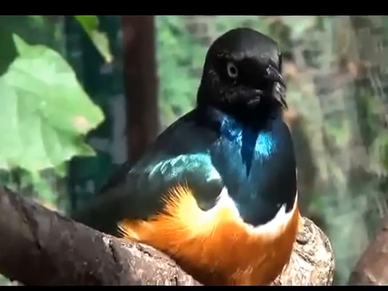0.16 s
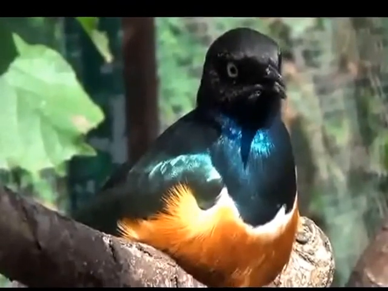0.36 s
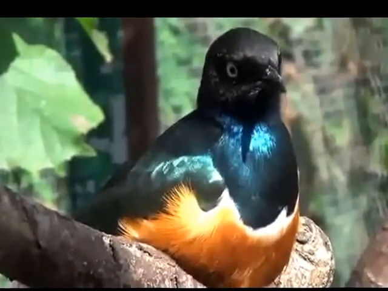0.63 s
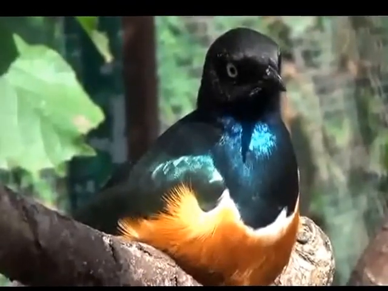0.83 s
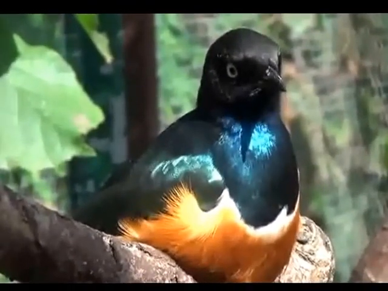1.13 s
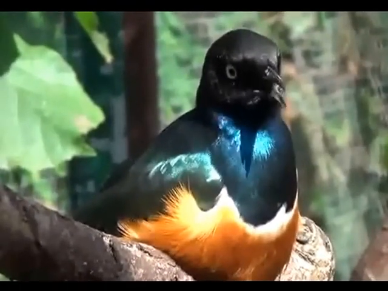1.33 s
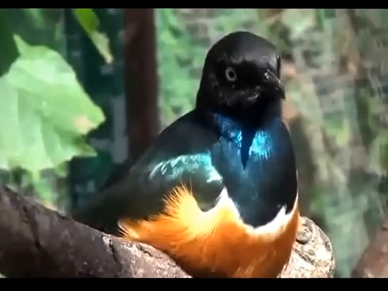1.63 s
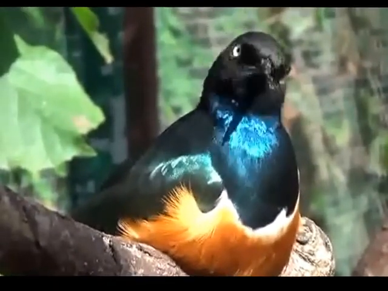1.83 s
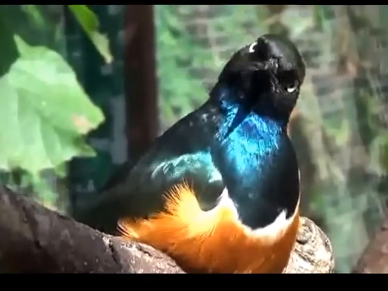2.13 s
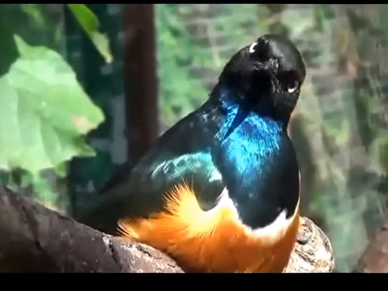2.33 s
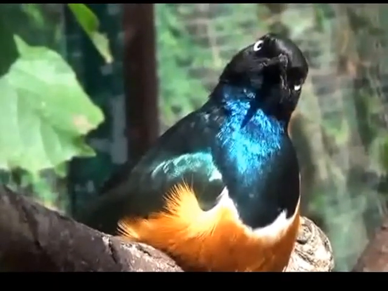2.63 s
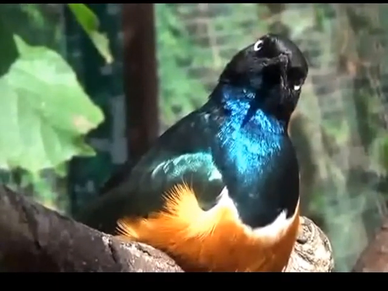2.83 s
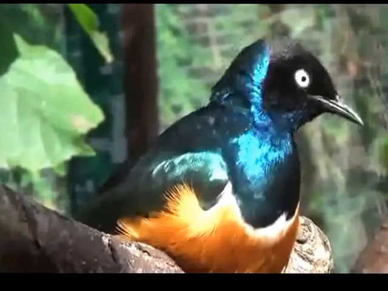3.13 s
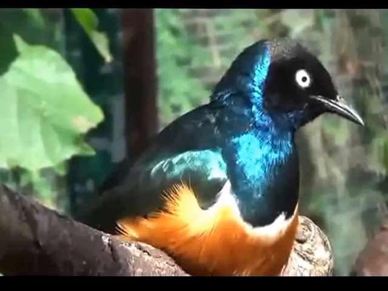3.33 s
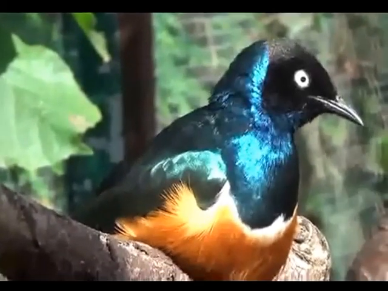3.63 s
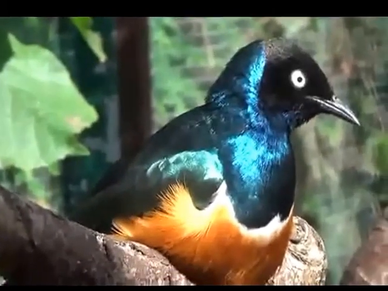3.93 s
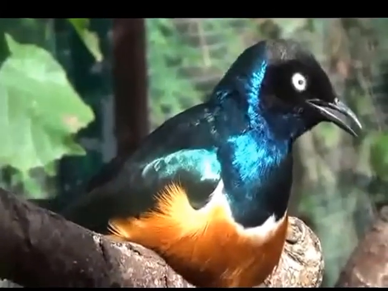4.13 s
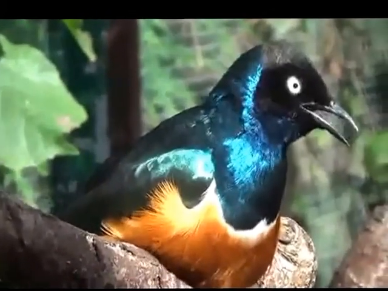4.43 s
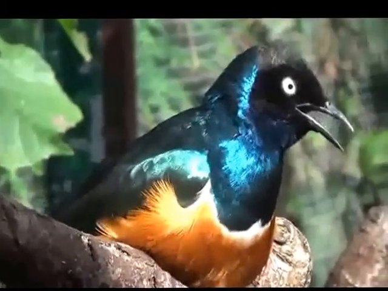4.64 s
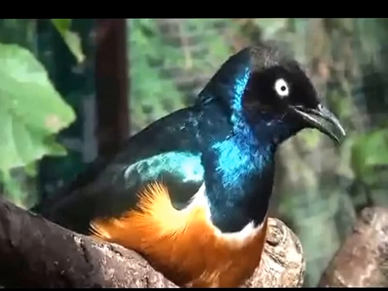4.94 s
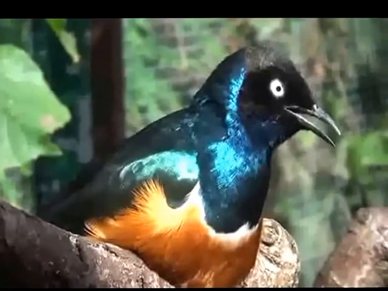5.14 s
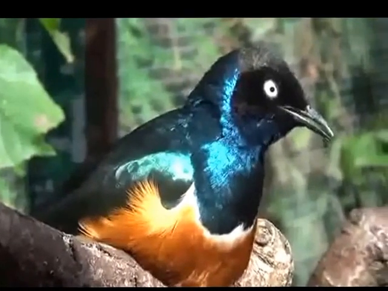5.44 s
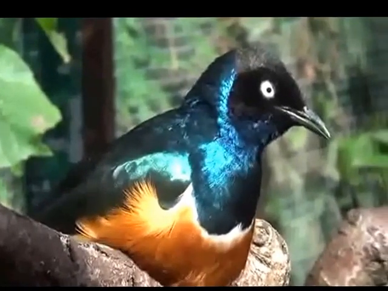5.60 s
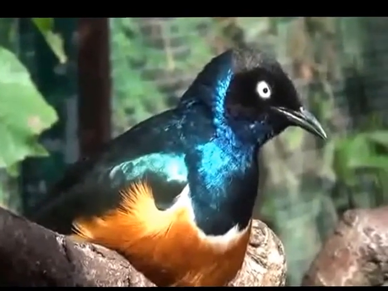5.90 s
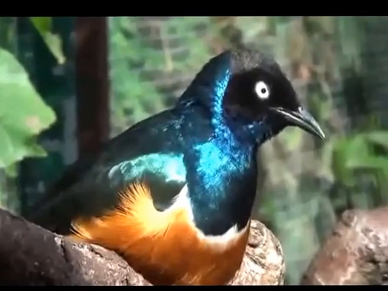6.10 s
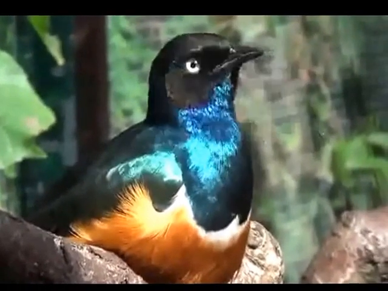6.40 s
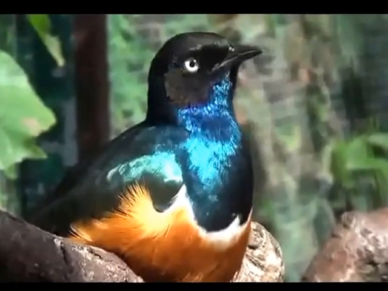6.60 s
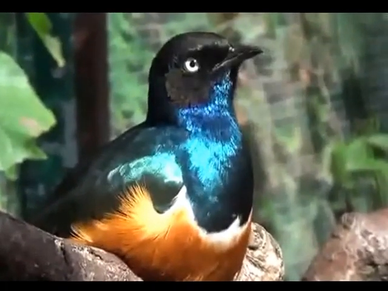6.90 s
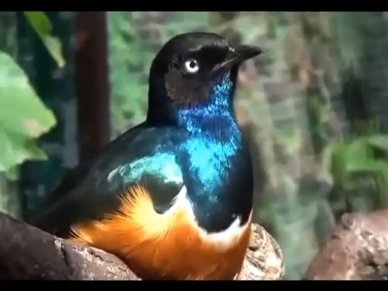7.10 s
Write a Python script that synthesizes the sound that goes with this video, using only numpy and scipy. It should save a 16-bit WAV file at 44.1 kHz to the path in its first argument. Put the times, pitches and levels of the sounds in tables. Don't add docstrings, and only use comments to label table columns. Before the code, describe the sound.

Chattering growls, bright arched chirps, piercing whistles and nasal rasps from one near bird, with more distant birds and soft rustle behind, slightly overloaded.

```python
import sys
import numpy as np
from scipy import signal
from scipy.fft import rfft, irfft
from scipy.io import wavfile
from scipy.ndimage import uniform_filter1d

SR = 44100
rng = np.random.default_rng(int(sys.argv[2]) if len(sys.argv) > 2 else 0)


def how_loud(loudness_db):
    steps = np.asarray(loudness_db, float) / 20
    return 10 ** steps


def to_wav(sig):
    pcm = np.clip(np.atleast_2d(sig), -1, 1) * 32767
    pcm = np.round(pcm).astype(np.int16)
    wavfile.write(sys.argv[1], SR, pcm.T)


N = 320166

SNAP_S = 0.0025


def starling():
    song = growl() + chirps() + whistles() + trill() + rattle() + nasal() + rasp()
    early = how_loud(-12) * hall_echo(song, t60=0.13, delay=0.007)
    late = how_loud(-22) * hall_echo(song, t60=0.28, delay=0.02)
    return song + early + late


def growl():
    # start and length in seconds, first and last pitch in Hz, level in dB.
    lead_in = [
        (.085, 0.092, 689, 993, -26),
        (.17, 0.081, 1073, 1156, -12.5),
    ]
    notes = glides(lead_in, attack=0.7, release=0.08, in_db=-5, out_db=-6, bend=1.5)
    return syrinx(notes, jitter=0.03, shimmer_db=2.5, beat=0.4, tug=0.4, beat_hz=240, tilt_db=-10)


def chirps():
    return syrinx(arches(), jitter=0.012, shimmer_db=3, beat=0.18, tug=0.15, beat_hz=260, count=1, tilt_db=0)


def arches():
    # start in seconds, time to the fall in seconds, length in seconds,
    # pitch after the snap in Hz, end pitch in Hz.
    chirp_rows = [
        (1.408, 0.038, .053, 2867, 2966),
        (1.513, 0.028, 0.042, 3230, 3085),
        (1.603, .04, .052, 3200, 2660),
        (1.713, 0.032, .058, 3255, 2445),
        (1.877, 0.019, 0.041, 2560, 1850),
    ]
    foot_hz, shoulder_hz, top_hz = 2380, 3507, 3700
    rise_s = 0.0096
    onset_db, fall_db, slide_db_per_khz = -16, -5.5, -18.5
    notes = []
    for k, (start, fall, length, shelf, end) in enumerate(chirp_rows):
        db = 1 - 0.34 * k
        tail_db = db + fall_db + slide_db_per_khz * (shelf - end) / 1000
        notes.append([
            (start, max(end, foot_hz), db + onset_db),
            (start + rise_s / 3, (end + shoulder_hz) / 2, db + fall_db),
            (start + rise_s, shoulder_hz, db),
            (start + fall - SNAP_S, top_hz, db),
            (start + fall + SNAP_S, shelf, (db + tail_db) / 2),
            (start + length, end, tail_db)])
    return notes


def whistles():
    # start and length in seconds, start and crest pitch in Hz, level in dB.
    long_rows = [
        (3.68, 0.16, 3032, 3694, -17),
        (4.7, .125, 3184, 3934, -9),
    ]
    # start and length in seconds, start and crest pitch in Hz, level in dB.
    short_rows = [
        (4.43, .072, 2826, 3750, -5.5),
        (5.2, .08, 3500, 3804, -6),
    ]
    notes = (crests(long_rows, crest_at=0.6, halfway=0.35, spike=1.005)
             + crests(short_rows, crest_at=0.55, halfway=0.8, spike=1.12)
             + hooks())
    return syrinx(notes, jitter=0.008, shimmer_db=2.2, beat=0.12, tug=0.1, beat_hz=300, count=1, tilt_db=0)


def crests(rows, crest_at, halfway, spike):
    rest_hz, climb_db, sink_db = 2970, -5.5, -10
    notes = []
    for start, length, hz, top, db in rows:
        crest = start + crest_at * length
        notes.append([
            (start, hz, db + climb_db),
            (start + crest_at * length / 2, hz + halfway * (top - hz), db),
            (crest - SNAP_S, top, db),
            (crest, top * spike, db + sink_db),
            (crest + SNAP_S, top, db),
            (start + length, rest_hz, db + sink_db)])
    return notes


def hooks():
    # start and length in seconds, first and last pitch in Hz, level in dB.
    hook_rows = [
        (4.51, 0.039, 3192, 3435, -2),
        (5.281, 0.046, 3030, 3390, -8),
        (5.384, 0.055, 4950, 4145, -8),
    ]
    settle, swell_db = 0.28, -12
    flick_s, flick_hz, flick_db = 0.0075, 2007, -12
    rebound_s, rebound_hz = 0.022, 2900
    notes = []
    for start, length, hz0, hz1, db in hook_rows:
        end = start + length
        notes.append([
            (start, hz0, db + swell_db),
            (start + settle * length, hz1 + 0.12 * (hz0 - hz1), db + swell_db / 2),
            (end, hz1, db),
            (end + flick_s, flick_hz, db + flick_db),
            (end + flick_s + rebound_s, rebound_hz, db + 2 * flick_db)])
    return notes


def trill():
    # start and length in seconds, first and last pitch in Hz, level in dB.
    tail_rows = [
        (3.82, 0.055, 3090, 2890, -18.5),
        (4.825, .05, 3096, 2936, -10),
    ]
    # start and length in seconds, first and last pitch in Hz, level in dB.
    flat_rows = [
        (3.435, .1, 3180, 3673, -9.5),
    ]
    notes = glides(tail_rows, attack=0.3, release=0.4, in_db=-0.5, out_db=-10.5, bend=0.2)
    notes = notes + glides(flat_rows, attack=0.26, release=0.052, in_db=3.5, out_db=-14, bend=0.44)
    return syrinx(notes, jitter=0.015, shimmer_db=2.2, beat=0.5, tug=0.15, beat_hz=115, count=1, tilt_db=0)


def rattle():
    # start and length in seconds, first and last pitch in Hz, level in dB.
    bursts = [
        (.252, 0.028, 1886, 1990, -7.5),
        (.274, 0.018, 2136, 1639, -3.5),
        (.29, 0.037, 1543, 1435, 5.5),
        (.365, 0.077, 1587, 1080, -5.5),
        (.472, .016, 1160, 1122, -7),
        (.492, .012, 1290, 1168, 0),
        (.506, 0.033, 1140, 1114, -13.5),
    ]
    notes = ratchet(glides(bursts, attack=0.24, release=0.5, in_db=-13, out_db=-10.5, bend=0.45), depth=-0.13)
    return syrinx(notes, jitter=0.022, shimmer_db=2.8, beat=0.4, tug=0.35, beat_hz=190, tilt_db=-4.5)


def nasal():
    # start and length in seconds, first and last pitch in Hz, level in dB.
    leads = [
        (0, 0.046, 604, 577, -32),
        (.75, .1, 996, 1010, -35.5),
        (4.222, 0.069, 1318, 1361, -3),
        (4.995, 0.07, 1257, 1354, -12.5),
    ]
    notes = glides(leads, attack=0.54, release=0.15, in_db=-13.5, out_db=-18, bend=1)
    return syrinx(notes, jitter=0.016, shimmer_db=2.5, beat=0.3, tug=0.22, beat_hz=220, tilt_db=-4.5)


def rasp():
    # start and length in seconds, first and last pitch in Hz, level in dB.
    rasp_rows = [
        (.33, .03, 1550, 1493, -8),
        (.988, 0.055, 2190, 1831, -24.5),
        (4.275, 0.055, 1245, 1582, -7),
        (4.32, .115, 1730, 2550, -10.5),
        (4.558, 0.16, 2040, 2900, -11.5),
        (5.045, 0.079, 1250, 1503, -13),
        (5.12, 0.066, 1700, 2498, -9.5),
    ]
    notes = ratchet(glides(rasp_rows, attack=0.13, release=0.12, in_db=-7.5, out_db=0.5, bend=1.8), depth=0.22)
    return syrinx(notes, jitter=0.03, shimmer_db=3.2, beat=0.55, tug=0.6, beat_hz=310, tilt_db=-3.5)


def glides(rows, attack, release, in_db, out_db, bend):
    u = np.linspace(0, 1, num=24)
    shape_db = in_db * np.clip(1 - u / attack, 0, 1) + out_db * np.clip(1 - (1 - u) / release, 0, 1)
    return [np.column_stack([start + u * length, hz0 + (hz1 - hz0) * u ** bend, db + shape_db])
            for start, length, hz0, hz1, db in rows]


def ratchet(notes, depth):
    step_s, stroke_hz = 0.0005, 58
    out = []
    for note in notes:
        s = np.arange(note[0, 0], note[-1, 0], step_s)
        uneven = how_loud(uniform_filter1d(18 * rng.standard_normal(len(s)), size=30))
        stroke = np.cumsum(stroke_hz * step_s * uneven) % 1
        hz = np.interp(s, note[:, 0], note[:, 1]) * (1 + depth * (stroke - 0.5))
        out.append(np.column_stack([s, hz, np.interp(s, note[:, 0], note[:, 2])]))
    return out


def syrinx(notes, jitter, shimmer_db, beat, tug, beat_hz, tilt_db, count=8):
    # frequency in Hz, gain in dB.
    throat = [(500, 6), (1200, -13), (2000, -0.5), (3000, 12.5), (4000, 7), (5500, -4), (7000, -32)]
    # time in seconds, left minus right in dB.
    bearing = [(0.0, -1.5), (0.71, -1), (1.21, -10), (2.2, 4.5), (2.61, -7.5), (3.13, 1), (3.35, -16.5),
               (3.98, -2), (5.42, -0.5), (5.64, 3), (7.26, 5)]
    t = np.arange(N) / SR
    hz, gain = np.full(N, 3000.0), np.zeros(N)
    for note in notes:
        s, *columns = np.transpose(note)
        on = slice(int(s[0] * SR), int(s[-1] * SR))
        hz[on], db = (np.interp(t[on], s, column) for column in columns)
        gain[on] = how_loud(db)
    hz, gain = uniform_filter1d(hz, size=40), uniform_filter1d(gain, size=90)

    other = np.exp(2j * np.pi * np.cumsum(beat_hz * (1 + 0.23 * flutter(50))) / SR)
    phase = 2 * np.pi * np.cumsum(hz * (1 + jitter * flutter(170))) / SR + tug * other.imag
    shake = how_loud(shimmer_db * flutter(130)) / (1 - beat * other)

    tone, power = 0, 0
    for k in range(1, count + 1):
        weight = how_loud(on_log(throat, k * hz) + tilt_db * np.log2(k)) * (k * hz < 8000)
        tone = tone + weight * np.exp(1j * (k * phase + k * k))
        power = power + weight ** 2 / 2
    tone /= np.sqrt(power)
    voice = np.imag(tone * shake) / np.sqrt(np.mean(abs(shake) ** 2)) * gain
    pan_db = np.interp(t, *np.transpose(bearing))
    return voice * how_loud(np.array([pan_db, -pan_db]) / 2)


def hall_echo(x, t60, delay):
    t = np.arange(SR // 2) / SR
    tail = rng.standard_normal((2, len(t))) * how_loud(-60 * t / t60) * np.clip(t / delay, 0, 1)
    tail /= np.sqrt((tail ** 2).sum(axis=1, keepdims=True))
    return signal.fftconvolve(x, tail, axes=1)[:, :N]


def neighbours():
    # start and length in seconds, first and last pitch in Hz, level in dB.
    warble_rows = [(1.193, .085, 3283, 3135, -13), (1.34, .06, 3488, 3037, -16.5),
                   (2.05, .15, 3423, 3930, -20.5), (2.33, .15, 3000, 2792, -14.5),
                   (2.84, 0.12, 3330, 3057, -16), (3.09, 0.22, 3497, 3085, -15.5),
                   (3.93, .14, 3200, 2933, -12.5), (5.48, 0.29, 3200, 3174, -22),
                   (5.72, .17, 3167, 3660, -15.5), (5.9, .2, 3500, 3061, -18), (6.11, .07, 2900, 2217, -20),
                   (6.21, 0.17, 2680, 3177, -12), (6.48, 0.22, 2700, 3290, -18),
                   (6.69, 0.073, 3250, 2826, -21), (6.78, 0.17, 3122, 3350, -15),
                   (7.08, .07, 2956, 2900, -37), (7.17, .09, 3400, 2940, -22.5)]
    # start and length in seconds, first and last pitch in Hz, level in dB.
    drop_rows = [
        (2.33, .04, 4190, 2746, -33),
        (2.36, .12, 2700, 2900, -39.5),
        (3.09, .11, 3700, 2880, -34.5),
        (5.77, .07, 2300, 2108, -36),
        (5.9, .1, 3900, 2544, -26),
        (6.175, .045, 3800, 3933, -30),
        (6.22, .07, 2900, 2390, -30.5),
        (6.42, .05, 3690, 3630, -26.5),
        (6.465, .065, 2750, 2260, -28),
    ]
    # start and length in seconds, first and last pitch in Hz, level in dB.
    rasp_rows = [
        (2.5, .1, 1262, 1950, -10),
        (2.59, .24, 1946, 1847, -7.5),
        (3.3, 0.15, 1298, 2108, -10),
        (3.54, 0.18, 2147, 2900, -13),
        (6.73, 0.18, 1664, 2133, -19.5),
    ]
    phrases = glides(warble_rows, attack=0.21, release=0.44, in_db=-8, out_db=-10.5, bend=0.8)
    drops = glides(drop_rows, attack=0.35, release=0.13, in_db=-5.5, out_db=-3, bend=1)
    scrapes = glides(rasp_rows, attack=0.3, release=0.15, in_db=-6, out_db=-3, bend=1.2)
    warble = syrinx(phrases, jitter=0.045, shimmer_db=4.5, beat=0.3, tug=0.9, beat_hz=170, count=1, tilt_db=0)
    falls = syrinx(drops, jitter=0.022, shimmer_db=4, beat=0.25, tug=0.35, beat_hz=170, count=1, tilt_db=0)
    far_rasp = syrinx(scrapes, jitter=0.06, shimmer_db=2.4, beat=0.65, tug=0.9, beat_hz=290, tilt_db=-2.5)
    song = how_loud(-0.5) * warble + how_loud(15.5) * falls + far_rasp
    return how_loud(-10.5) * song + how_loud(-12) * hall_echo(song, t60=0.1, delay=0.01)


def faint_calls():
    # start and length in seconds, first and last pitch in Hz, level in dB.
    coos = [(.74, .16, 310, 450, -39), (1.0, .05, 455, 445, -38), (1.18, .09, 710, 690, -41),
            (1.56, .1, 520, 480, -41), (2.4, .05, 480, 480, -35), (2.58, .2, 880, 820, -39),
            (2.63, .07, 485, 470, -40), (6.68, .1, 700, 710, -41), (7.11, .1, 1250, 1260, -36),
            (7.11, .07, 640, 670, -37), (7.14, .05, 220, 222, -39), (6.32, .28, 1530, 1530, -46)]
    # start and length in seconds, first and last pitch in Hz, level in dB.
    pips = [(.978, .027, 1900, 5300, -30), (1.6, .012, 5000, 5500, -27), (0, .1, 5400, 5350, -38),
            (2.14, .16, 5420, 5300, -35), (2.46, .04, 4250, 4250, -35), (2.4, .05, 2300, 2200, -31),
            (2.94, .05, 2300, 2280, -34), (7.065, .025, 4050, 3950, -25), (7.01, .05, 4500, 4500, -37),
            (3.33, .05, 3950, 3950, -25), (7.235, .02, 2850, 2850, -27), (.91, .05, 5250, 5200, -42)]
    # start and length in
    # seconds, first and last pitch in Hz, level in dB.
    held = [(4.76, .04, 1960, 1930, -32), (4.995, .045, 1900, 1900, -31), (4.31, .1, 1900, 1910, -22),
            (4.645, .055, 2850, 3000, -16), (5.135, .065, 2900, 2920, -15), (4.87, .07, 3000, 2950, -30),
            (3.225, .05, 1183, 1225, -31)]
    out = np.zeros(N)
    for start, length, hz0, hz1, db in coos + pips + held:
        on = slice(int(start * SR), int((start + length) * SR))
        u = np.linspace(0, 1, len(out[on]))
        swell = np.sqrt(2 * np.sin(np.pi * u))
        phase = 2 * np.pi * np.cumsum(hz0 + (hz1 - hz0) * u) / SR
        out[on] += how_loud(db) * swell * np.sin(phase)
    return out * how_loud(2.5 * flutter(60))


def hall():
    # frequency in Hz, level in dB per Hz.
    rustle_spectrum = [(24, -44.5), (40, -11), (172, -5), (367, -3), (469, -2), (1090, -2), (1420, -4.5),
                       (2520, -4.5), (3100, -19.5), (3580, -26), (5390, -6), (7010, -35.5), (11900, -120)]
    # time in seconds, rustle level in dB.
    ducking = [(0.0, -36), (0.5, -41.5), (1.3, -40.5), (1.8, -44.5), (2.42, -37.5), (3.25, -39.5),
               (3.7, -47), (4.25, -38.5), (4.75, -48.5), (5.4, -45.5), (5.8, -42.5), (7.26, -37.5)]
    # time in seconds, level in dB.
    flock_db = [(0, -20), (.6, -31.5), (1.3, -38.5), (2.0, -25), (3.7, -15), (4.15, -26), (5.6, -17.5),
                (7.26, -23.5)]
    t = np.arange(N) / SR
    rustle_db = np.interp(t, *np.transpose(ducking)) + 4.5 + 1.9 * flutter(7)
    rustle = coloured(rustle_spectrum) * how_loud(rustle_db)
    return rustle + flock() * how_loud(np.interp(t, *np.transpose(flock_db)))


def flock():
    # frequency in Hz, level in dB per Hz.
    chorus_spectrum = [(1500, -33), (2200, -6), (3200, -3), (4000, -1.5), (5000, -8), (5600, -18)]
    edges_hz = [1200, 2400, 3100, 3900, 4800, 6400]
    blur = coloured(chorus_spectrum)
    out = np.zeros((2, N))
    for edges in zip(edges_hz, edges_hz[1:]):
        register = signal.sosfilt(signal.butter(2, edges, "band", fs=SR, output="sos"), blur)
        out += register * how_loud(2.3 * flutter(9))
    return out


def coloured(spectrum):
    # frequency in Hz, left-right coherence from 0 to 1.
    likeness = [(60, 0.38), (110, 1), (210, 0.98), (400, 0.94), (750, 0.76), (1400, 0.73), (2630, 0.58),
                (4940, 0.33)]
    hz = np.arange(N // 2 + 1) * SR / N
    alike = np.sqrt(np.clip(on_log(likeness, hz), 0, 1))
    mid, side = rfft(rng.standard_normal((2, N)))
    ears = mid * np.sqrt(1 + alike) + side * np.sqrt(1 - alike) * np.array([[1], [-1]])
    x = irfft(ears * how_loud(on_log(spectrum, hz)), N)
    return x / x.std()


def flutter(rate_hz):
    x = signal.sosfilt(signal.butter(2, rate_hz, fs=SR, output="sos"), rng.standard_normal(N))
    return x / x.std()


def on_log(table, hz):
    f, v = np.transpose(table)
    return np.interp(np.log(np.maximum(hz, 1)), np.log(f), v)


def scene():
    return starling() + neighbours() + faint_calls() + hall()


def low_pass(x):
    return signal.sosfilt(signal.butter(12, 6350, fs=SR, output="sos"), x)


def record(dry):
    rounded = 1.3 * np.tanh(dry / 1.3)
    skirt = signal.sosfilt(signal.ellip(8, 0.2, 70, 6250, fs=SR, output="sos"), rounded)
    band = signal.sosfilt(signal.ellip(10, 0.2, 80, 5560, fs=SR, output="sos"), rounded)
    steady = signal.sosfilt(signal.butter(1, 45, "high", fs=SR, output="sos"), band + how_loud(-17) * skirt)
    boosted = how_loud(0.4) * steady
    return low_pass(np.clip(boosted, -1, 1))


dry = scene()
out = record(dry)
to_wav(out)
```